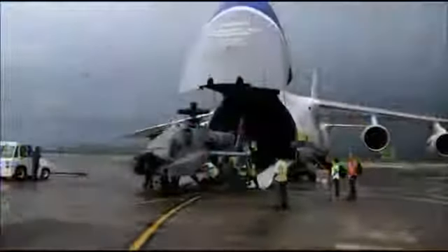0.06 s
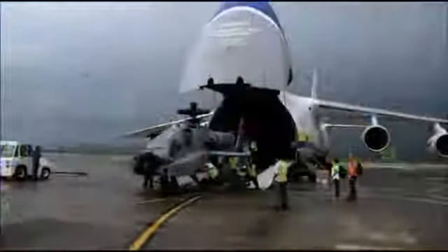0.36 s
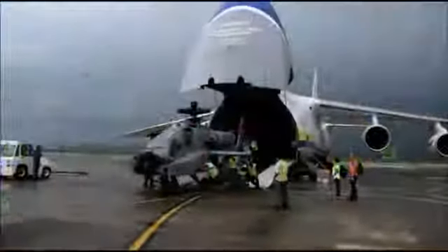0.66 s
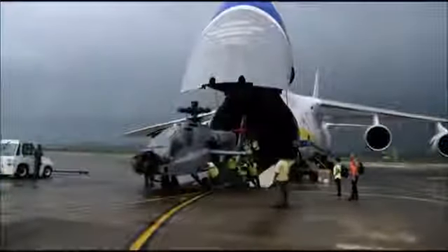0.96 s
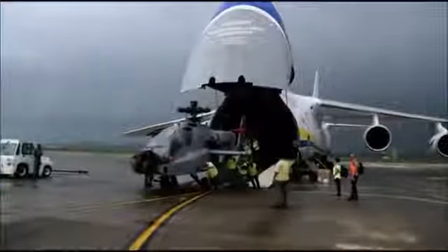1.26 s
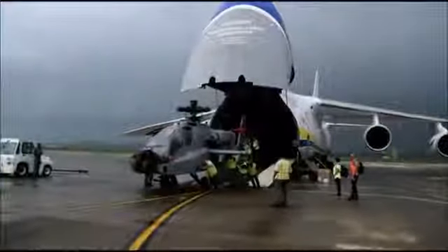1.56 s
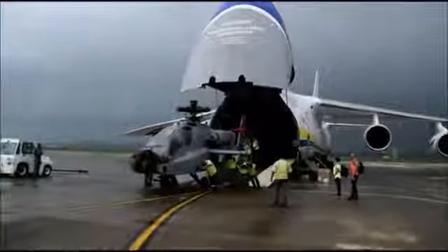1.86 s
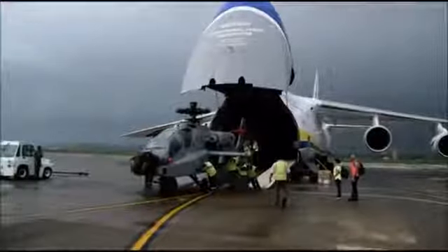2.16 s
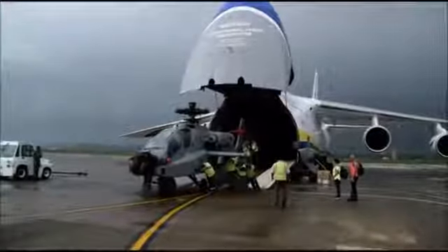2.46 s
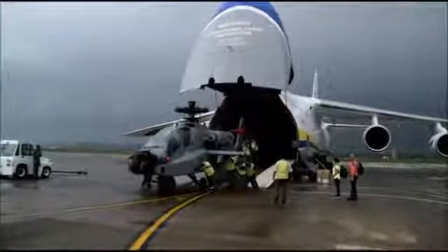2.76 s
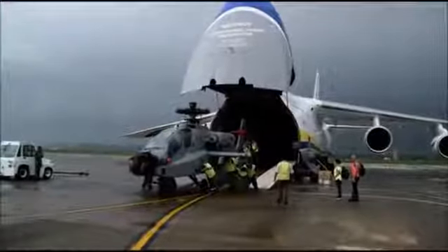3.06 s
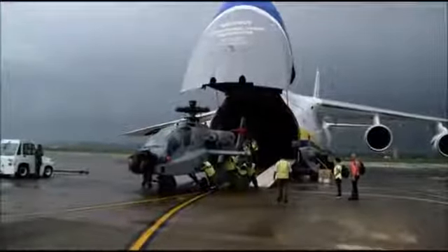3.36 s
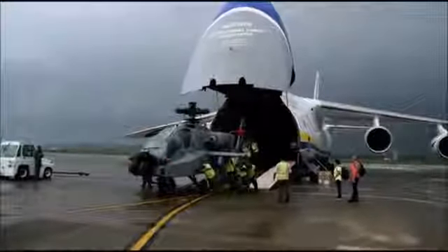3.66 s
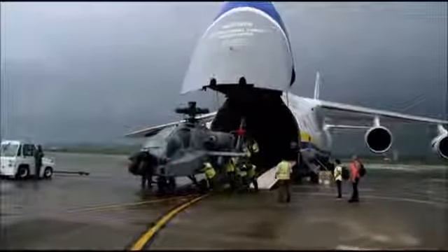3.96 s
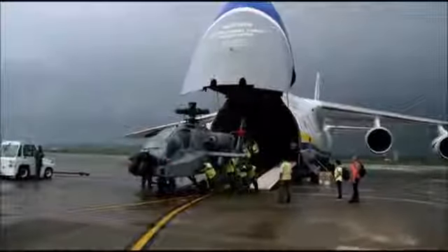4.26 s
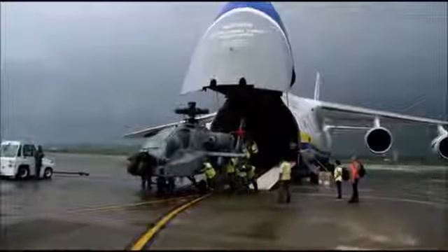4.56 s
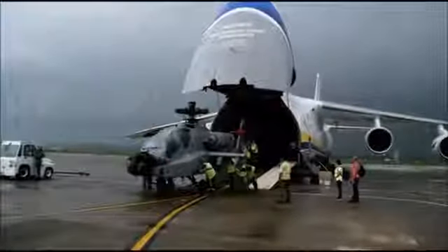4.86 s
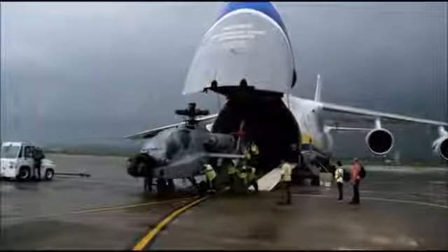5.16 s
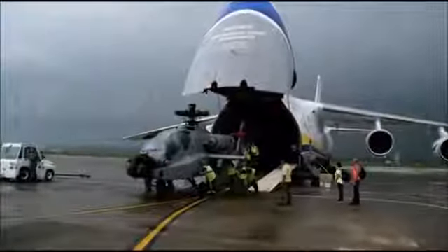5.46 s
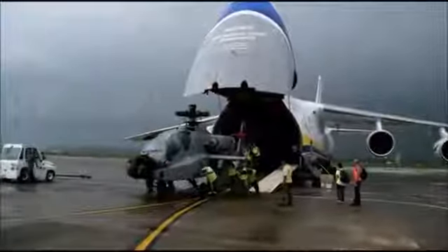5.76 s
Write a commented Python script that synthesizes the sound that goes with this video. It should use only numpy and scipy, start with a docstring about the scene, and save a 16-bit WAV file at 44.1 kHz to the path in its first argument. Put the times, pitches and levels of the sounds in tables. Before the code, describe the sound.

A high, hissing turbine whine swells and flutters in the breeze over the steady rush of a parked aircraft.

```python
"""A steady rush with a high, fluttering whine on top: a gas turbine some way off on an open airfield.
The exhaust makes the rush; the shaft, a gear, a fan and pumps add thin hums. Two faint squeaks pass.
The whine is a blade tone with a weaker tone on each side. It crosses hot, swirling air, which smears
all three into narrow hisses that swell and flutter together. The compressor's broad hiss swells too.
A deep gap is cut out of that hiss between about 10 and 11.5 kHz."""
import sys
import numpy as np
from scipy.fft import rfft, irfft, next_fast_len
from scipy.io import wavfile
from scipy.ndimage import uniform_filter1d, map_coordinates

SR = 44100
rng = np.random.default_rng(int(sys.argv[2]) if len(sys.argv) > 2 else 0)


def output_pcm(signal):
    """Save a mono or channel-first signal as 16-bit PCM at the path in sys.argv[1].

    Samples are clipped to [-1, 1] before scaling.
    """
    pcm = np.clip(np.atleast_2d(signal).T, -1, 1) * 32767
    wavfile.write(sys.argv[1], SR, np.round(pcm).astype(np.int16))


N = 255573
TIME = np.arange(N) / SR


def amp(db):
    """Turn decibels into a gain."""
    return 10 ** (np.asarray(db) / 20)


def unit(x):
    """Scale a signal to an average power of 1."""
    return x / np.sqrt(np.mean(np.abs(x) ** 2) + 1e-20)


def along(points, hz):
    """Read between (f/Hz, value) points on a log frequency axis."""
    f, values = np.transpose(points)
    return np.interp(np.log(hz + 1), np.log(f + 1), values)


def curve(points):
    """Join (t/s, value) points with straight lines."""
    return np.interp(TIME, *np.transpose(points))


def wobble(rate):
    """A smooth random curve through `rate` points a second."""
    points = rng.standard_normal(int(N * rate / SR) + 4)
    return unit(map_coordinates(points, [TIME * rate]))


def filtered(x, response):
    """Give each frequency in x the gain response(hz)."""
    size = next_fast_len(N + SR // 4)
    return irfft(rfft(x, size) * response(np.fft.rfftfreq(size, 1 / SR)), size)[..., :N]


def split(difference):
    """Give each ear half of a left-right difference."""
    return difference * np.array([[1], [-1]]) / 2


def stereo_noise(gain, width):
    """Shaped noise: the ears share a middle part and get a side part with opposite signs."""
    white = rng.standard_normal((2, N))
    mid, side = filtered(white, lambda hz: gain(hz) * amp([np.zeros_like(hz), along(width, hz)]))
    return np.array([mid + side, mid - side]) / np.std(mid)


def tone(hz, fade, drift, apart):
    """A tone in moving air: strength (fade) and phase (drift) wander, unevenly by ear (apart)."""
    phase = 2 * np.pi * hz * TIME + drift * (wobble(4) + 0.33 * wobble(22))
    strength = 1 + fade * np.tanh(wobble(21.09))
    return unit(strength * np.sin(phase + split(apart * wobble(12))))


# far squeaks: start t/s, length/s, first f/Hz, last f/Hz, level/dB
SQUEAKS = [(0.918, 0.084, 1097, 1104, -52.5), (1.135, 0.1, 870, 808, -57)]

def squeaks():
    """Each faint squeak is one sliding tone that swells and fades."""
    out = np.zeros(N)
    for start, length, from_hz, to_hz, db in SQUEAKS:
        progress = np.clip((TIME - start) / length, 0, 1)
        phase = 2 * np.pi * np.cumsum(from_hz + (to_hz - from_hz) * progress) / SR
        out += amp(db) * np.sin(np.pi * progress) * unit(np.sin(phase))
    return out


# how loud the lower pump tone is: t/s, level/dB
PUMP_LEVEL = [(0.0, -60.5), (2.6, -60), (3.6, -65), (5.8, -64)]

def pumps():
    """The pumps sing one thin tone with a fainter whistle above it."""
    lower = amp(curve(PUMP_LEVEL)) * tone(hz=4527.5, fade=0.35, drift=0.16, apart=0.31)
    whistle = amp(-68) * tone(hz=7362, fade=0.34, drift=0.62, apart=0.27)
    return lower + whistle


# how loud the fan is: t/s, level/dB
FAN_LEVEL = [(0.0, -63), (0.12, -61), (0.25, -53), (0.38, -60), (0.8, -56.5), (0.95, -59), (1.04, -53),
             (1.11, -64), (1.35, -54.5), (1.61, -63), (1.73, -54), (1.97, -60), (2.22, -52.5), (2.36, -63),
             (2.46, -55), (2.58, -63), (2.69, -55), (2.8, -64), (2.99, -55.5), (3.33, -66), (3.41, -53),
             (3.68, -56.5), (3.86, -64), (3.95, -54.7), (4.3, -55.3), (4.47, -61.5), (4.98, -56.5),
             (5.14, -68), (5.33, -57), (5.6, -64), (5.68, -54.5), (5.8, -58)]

def cooling_fan():
    """The fan's hum comes and goes."""
    return amp(curve(FAN_LEVEL)) * tone(hz=449, fade=0.15, drift=0.9, apart=0.14)


SHAFT_HZ = 404.17
# how loud the gear is: t/s, level/dB
GEAR_LEVEL = [(0.0, -64), (0.2, -67), (0.7, -67), (0.86, -61.7), (0.98, -66), (1.31, -63.5), (1.65, -67.5),
              (1.86, -62.5), (2.0, -69), (2.23, -60.5), (2.53, -62), (2.67, -57.2), (2.86, -64.5),
              (3.14, -56.7), (3.4, -60.3), (3.5, -59), (3.8, -61), (3.92, -58.8), (4.4, -59.5), (4.53, -58),
              (4.76, -61.5), (4.88, -57), (5.05, -61.7), (5.45, -62.5), (5.7, -59)]

def gear():
    """A gear sings at nine times the shaft speed and comes forward halfway through."""
    return amp(curve(GEAR_LEVEL)) * tone(9 * SHAFT_HZ, fade=0.24, drift=0.43, apart=0.5)


# how loud the shaft's drone is: t/s, level/dB
DRONE_LEVEL = [(0.0, -59.3), (0.5, -59.7), (0.62, -63), (1.0, -58.5), (1.55, -58.7), (2.33, -59.5),
               (2.47, -64), (2.84, -58.5), (2.98, -63), (3.29, -59.5), (3.9, -65), (4.27, -60.5),
               (5.04, -64), (5.8, -60.5)]
# its higher tones: multiple of the shaft speed, level/dB
OVERTONES = [(3, -64.5), (4, -65.5), (6, -70.5), (10, -74), (11, -66.5), (16, -75)]

def shaft():
    """The spinning shaft drones at twice its speed, with weaker tones at higher multiples."""
    drone = amp(curve(DRONE_LEVEL)) * tone(2 * SHAFT_HZ, fade=0.25, drift=0.4, apart=0.03)
    return drone + sum(amp(db) * tone(multiple * SHAFT_HZ, fade=0.46, drift=0.4, apart=0.03)
                       for multiple, db in OVERTONES)


# the rush from low to high: f/Hz, relative level/dB
EXHAUST_COLOUR = [(25, -15), (60, -15), (105, -1.5), (180, -4.5), (500, 0.44), (780, 2), (900, -3.5),
                  (1050, -1), (1260, -1.5), (1580, 1.25), (1780, -2.5), (2300, -4.5), (2850, -7.5),
                  (3500, -9), (3900, -7), (8500, -16.5), (10500, -65)]
# where the duct rings: f/Hz, width/Hz, boost/dB
DUCT_RINGS = [(237, 80, 6.5), (682, 74, 5), (1025, 60, 2.5), (1125, 70, 2), (1330, 70, 2.5),
              (1520, 180, 1.7), (1880, 65, 3.5), (1977, 140, 3.5), (2476, 115, 6.5), (2650, 90, 3.5),
              (3054, 106, 5.5), (3174, 82, 5.5)]
# how wide the rush sounds: f/Hz, side minus middle/dB
EXHAUST_WIDTH = [(30, -6), (80, -10.5), (160, -13.5), (320, -18.5), (680, -12), (1100, -16), (1350, -30),
                 (1750, -29), (2200, -16), (2700, -9.5), (3800, -8), (9000, -8)]
# slow throb of its loudest band: t/s, relative level/dB
THROB_LEVEL = [(0.0, -1), (0.53, -1.3), (0.74, 2.8), (1.14, 0.4), (2.21, 0.2), (2.65, -2), (2.82, 2.2),
               (3.0, -0.8), (3.25, -1.2), (3.62, 0.6), (4.25, -2.8), (4.43, 1.6), (4.82, -1), (4.92, 3),
               (5.04, -0.5), (5.6, 3), (5.8, 3)]
# its lean to the left: f/Hz, left minus right/dB
EXHAUST_LEFT = [(300, 0.6), (700, 1.1), (1200, 0.1)]

def exhaust():
    """The jet makes broad noise, boosted where the duct rings and throbbing near 690 Hz."""
    def colour(hz):
        boost_db = sum(db / (1 + (2 * (hz - centre) / width) ** 2) for centre, width, db in DUCT_RINGS)
        return amp(along(EXHAUST_COLOUR, hz) + boost_db)

    rush = stereo_noise(colour, EXHAUST_WIDTH)
    # the middle pitches waver in the breeze
    middle = filtered(rush, lambda hz: np.exp(-np.log((hz + 1) / 1700) ** 2))
    rush = rush + middle * (amp(0.45 * wobble(9)) - 1)
    loudest_band = filtered(rush, lambda hz: np.exp(-((hz - 690) / 70) ** 2))
    throb = unit(amp(curve(THROB_LEVEL) + wobble(18)))
    rush = rush + loudest_band * (throb - 1)
    return amp(-46) * filtered(rush, lambda hz: amp(split(along(EXHAUST_LEFT, hz))))


# how well the air carries the whine: t/s, relative level/dB
CARRY_LEVEL = [(0.0, -36.3), (0.08, -38.8), (0.23, -37), (0.37, -40.6), (0.47, -38.8), (0.59, -45),
               (0.7, -43.3), (0.82, -39.8), (0.96, -41.1), (1.02, -37.6), (1.35, -39.3), (1.45, -37.3),
               (1.55, -39.6), (1.92, -34), (2.04, -34.9), (2.21, -32.1), (2.31, -35.8), (2.51, -37.2),
               (2.59, -41.5), (2.74, -37.1), (2.98, -38.3), (3.25, -37), (3.45, -42.3), (3.74, -40.2),
               (3.92, -43.4), (4.02, -43.4), (4.18, -38.4), (4.29, -41.9), (4.47, -37.5), (4.86, -40.1),
               (5.08, -38.3), (5.18, -35), (5.28, -34.5), (5.36, -37.3), (5.45, -33.2), (5.7, -35.6),
               (5.79, -41.5)]

def breeze():
    """The breeze makes slow swells with small, quick gusts on top, in dB."""
    return curve(CARRY_LEVEL) + 0.5 * wobble(30)


# eddies, small swirls of air: middle t/s, length/s, level change/dB
EDDIES = [(1.053, 0.03, 3), (1.078, 0.028, -6), (1.107, 0.012, 4), (1.25, 0.035, 3), (1.61, 0.033, -3),
          (1.643, 0.025, 2.5), (1.667, 0.015, -4), (1.687, 0.022, 3.5), (1.783, 0.027, 2.2),
          (2.92, 0.037, 2.5), (2.96, 0.045, -3.8), (3.105, 0.03, 3.5), (3.41, 0.035, 2.4),
          (3.533, 0.024, 3), (3.573, 0.05, -3.6), (4.54, 0.033, -6), (4.737, 0.04, 2), (4.954, 0.04, 2.4),
          (5.457, 0.013, 0)]

def eddies():
    """Each eddy focuses the whine or bends it away: one smooth bump or dip, in dB."""
    return sum(db * np.exp(-(2 * (TIME - middle) / length) ** 2) for middle, length, db in EDDIES)


# the hiss from low to high, with a deep gap cut out between about 10 and 11.5 kHz:
# f/Hz, relative level/dB
HISS_WITH_GAP = [(1500, -33), (3000, 4.5), (3900, -1), (4250, 3.5), (4500, 9), (4700, 4), (4850, 6.5),
                 (5500, -1), (6750, -0.5), (7200, 5.5), (7600, 5.5), (8300, 6), (8850, 17.5), (9250, 0.5),
                 (9600, 2.5), (10200, -39), (11300, -64), (11900, 0)]

def compressor_hiss(carry_db):
    """Broad compressor hiss swells with the whine in the same air; a gap is cut out of its treble."""
    width = [(4500, -9.5), (7500, -6.5), (9200, -2), (12000, -4.5)]  # f/Hz, side minus middle/dB
    noise = stereo_noise(lambda hz: amp(along(HISS_WITH_GAP, hz)), width)
    swell_db = 0.85 * (carry_db - np.mean(carry_db))
    flutter_db = 1.4 * wobble(150)
    return amp(-47 + swell_db + flutter_db + split(0.71)) * noise


def scattered(half_width_hz, reach_hz, edge_likeness):
    """Eddies smear a tone into a noise band; its edges come from wider angles, so the ears differ."""
    offset_hz = np.fft.fftfreq(next_fast_len(N), 1 / SR)
    band = np.exp(-(offset_hz / reach_hz) ** 2) / np.hypot(1, offset_hz / half_width_hz)
    alike = np.clip(edge_likeness + (1 - edge_likeness) / (1 + (offset_hz / 330) ** 2), 0, 1)
    shape = (2, len(offset_hz))
    noise = rng.standard_normal(shape) + 1j * rng.standard_normal(shape)
    mid, side = np.fft.ifft(noise * band * np.sqrt([1 + alike, 1 - alike]))[:, :N]
    return unit(np.array([mid + side, mid - side]))


# calmer air lets more clean tone through: t/s, clean level over smeared level/dB
CLEAN_LEVEL = [(0.1, -9), (0.45, -3), (0.66, -18), (1.05, -6), (1.3, -15), (1.45, -7), (2.05, -10),
               (2.24, -3.5), (2.65, -9), (3.0, -11), (3.25, -6), (3.55, -14), (4.0, -18), (4.45, -6),
               (4.85, -10), (5.24, 0.5), (5.35, -12), (5.45, -1.5), (5.7, -2), (5.8, -12)]

def hot_air():
    """Swirling air changes a tone's strength and phase; one complex gain per ear holds both."""
    clean = amp(curve(CLEAN_LEVEL) + 3 * wobble(20)) * np.exp(1j * (0.8 * wobble(6) + 0.55 * wobble(45)))
    # large eddies bend the pitch, small ones scatter it
    bend_hz = 50 * wobble(40)
    wavering = amp(-2) * np.exp(2j * np.pi * np.cumsum(bend_hz) / SR)
    path = clean + unit(wavering + scattered(half_width_hz=130, reach_hz=870, edge_likeness=0.064))
    # eddies stir phase more than strength, so the peaks are rounded off
    path = path / np.sqrt(1 + 0.11 * np.mean(np.abs(path) ** 2, axis=0))
    # they also bend the sound away for moments
    path = path * (1 + 0.4 * np.tanh(0.35 * wobble(60) + 0.55 * wobble(130) + 0.95 * wobble(320)))
    # scattering only moves energy about, so power holds steady over a tenth of a second
    power = np.mean(np.abs(path) ** 2, axis=0)
    return path / np.sqrt(np.abs(uniform_filter1d(power, size=SR // 10)))


BLADE_HZ, SIDEBAND_HZ = 8487.6, 3894  # the blade tone, and the step to each side tone
# the three tones: f/Hz, relative level/dB, extra left minus right/dB
BLADE_TONES = [(BLADE_HZ - SIDEBAND_HZ, -13, -0.38), (BLADE_HZ, 0, 0), (BLADE_HZ + SIDEBAND_HZ, -17, -0.44)]
# the whine sways a little on the left: t/s, left minus right/dB
WHINE_LEFT = [(0.0, 3), (0.35, 1.5), (1.1, 2), (1.4, 2.5), (3.1, 3.2), (3.6, 2), (4.4, 3.5), (5.3, 3),
              (5.8, 3.4)]

def blade_whine(carry_db):
    """The blades' three tones cross the same hot air, so they flutter together."""
    path = hot_air() * np.exp(1j * split(0.6))  # the turbine stands to the left, so that ear leads
    left_db = curve(WHINE_LEFT)
    tones = np.zeros((2, N))
    for hz, db, extra_left_db in BLADE_TONES:
        smeared = np.real(path * np.exp(2j * np.pi * hz * TIME))
        tones += amp(db + split(left_db + extra_left_db)) * smeared
    return amp(carry_db + 2.5) * tones


def scene():
    """The turbine runs at steady speed; one breeze carries both whine and hiss."""
    carry_db, eddy_db = breeze(), eddies()
    rush = exhaust()
    hums = shaft() + gear() + cooling_fan() + pumps()
    whine = blade_whine(carry_db + eddy_db)
    hiss = compressor_hiss(carry_db + 0.35 * eddy_db)  # broad hiss feels the eddies less
    return squeaks() + hums + rush + hiss + whine


def record(dry):
    """Cut away the highest treble, from 13150 Hz up."""
    return filtered(dry, lambda hz: hz < 13150)


dry = scene()
out = record(dry)
output_pcm(out)
```